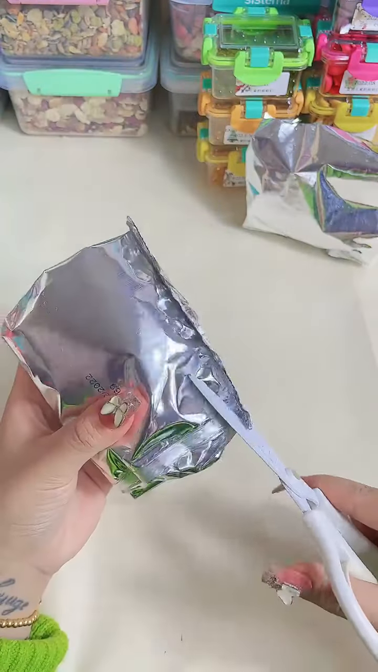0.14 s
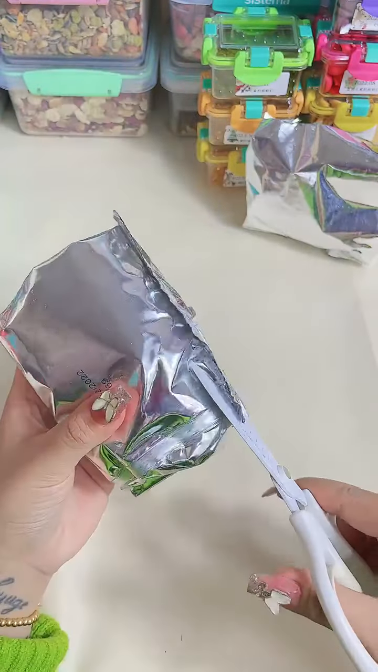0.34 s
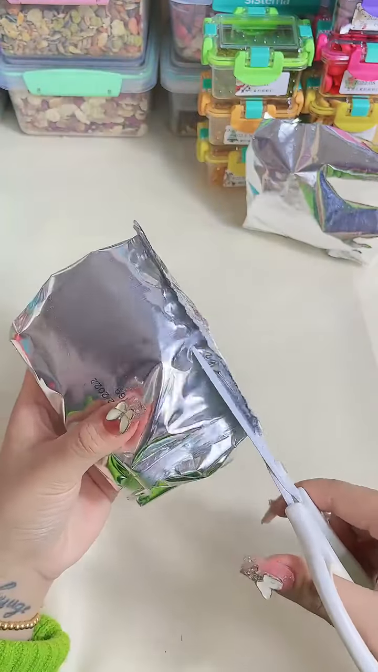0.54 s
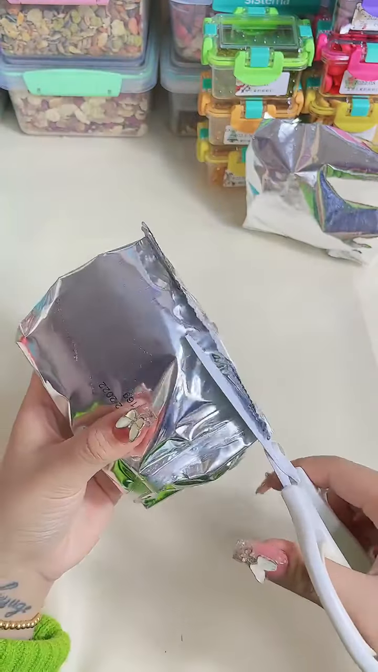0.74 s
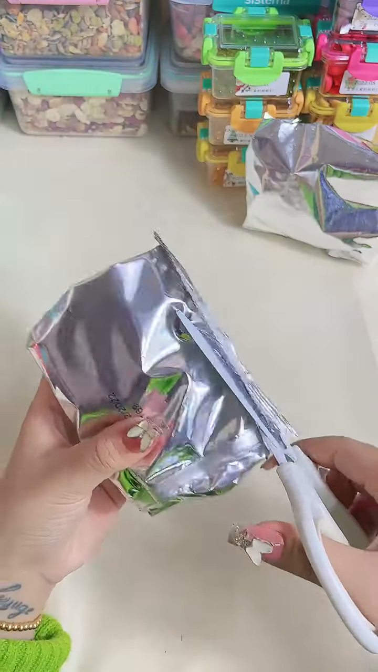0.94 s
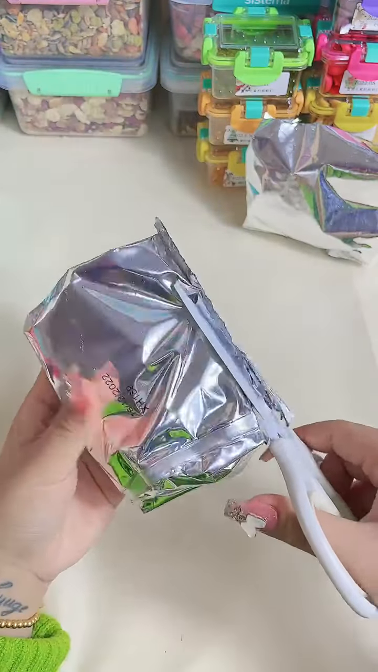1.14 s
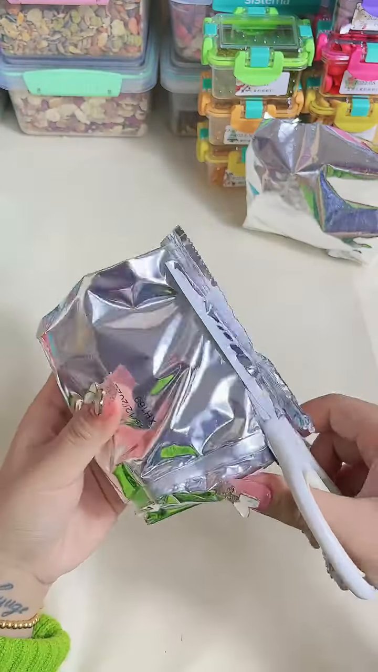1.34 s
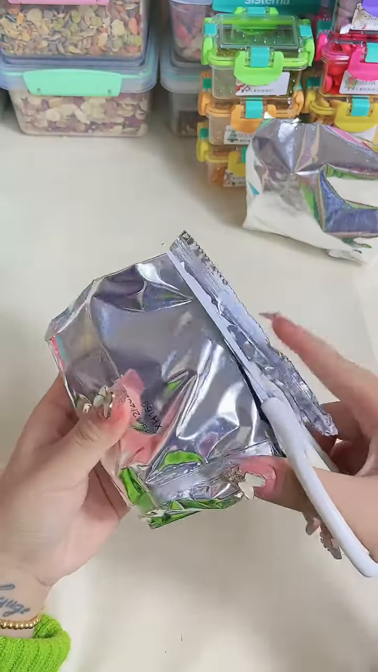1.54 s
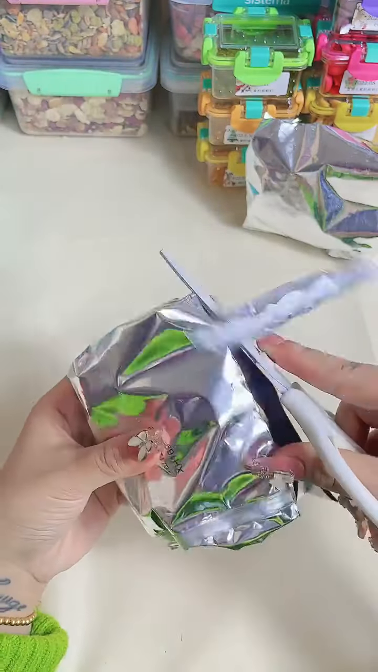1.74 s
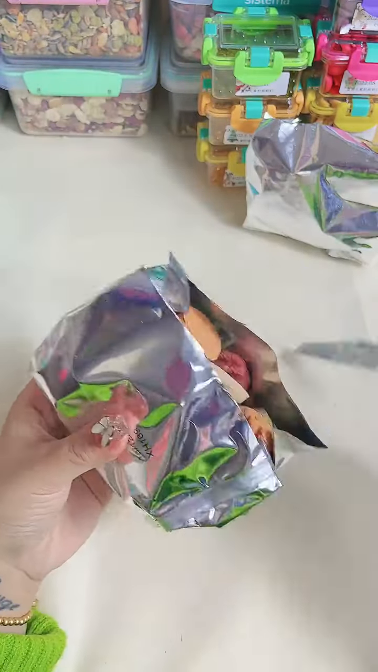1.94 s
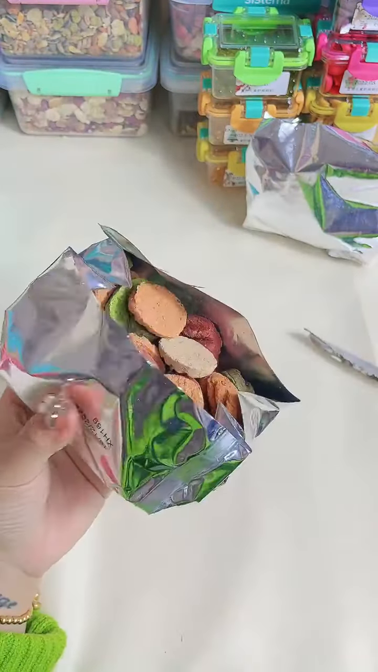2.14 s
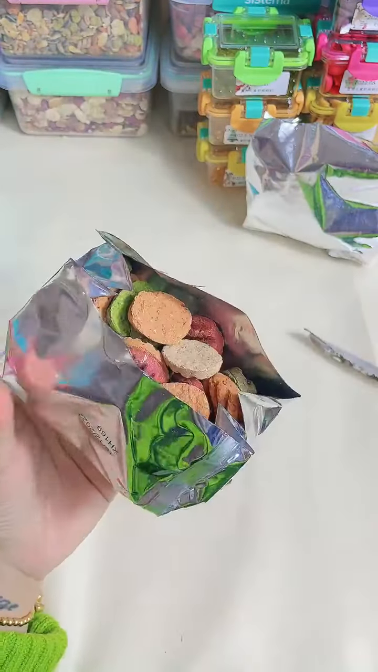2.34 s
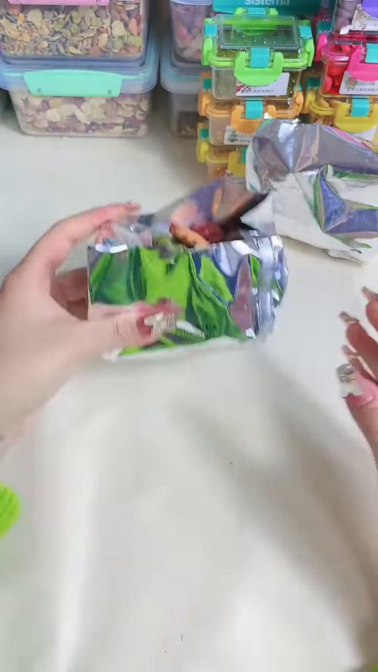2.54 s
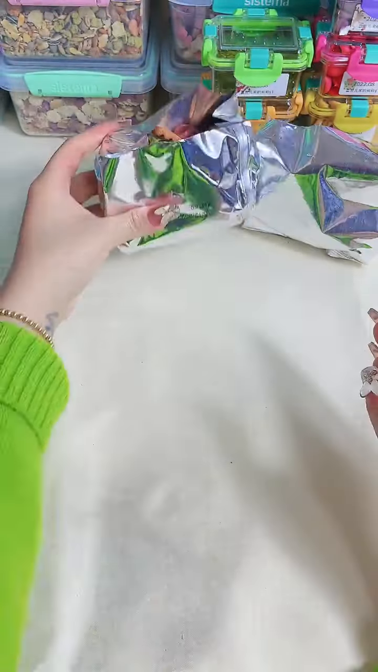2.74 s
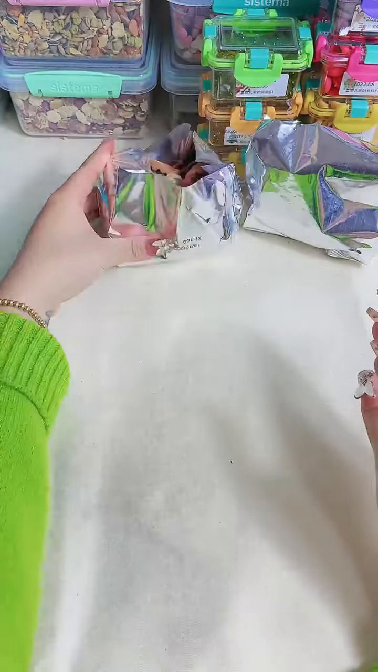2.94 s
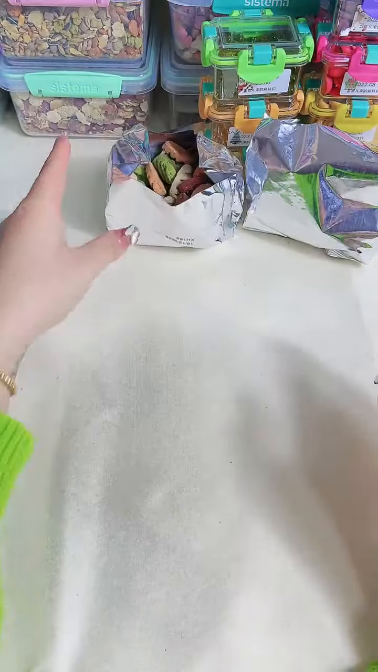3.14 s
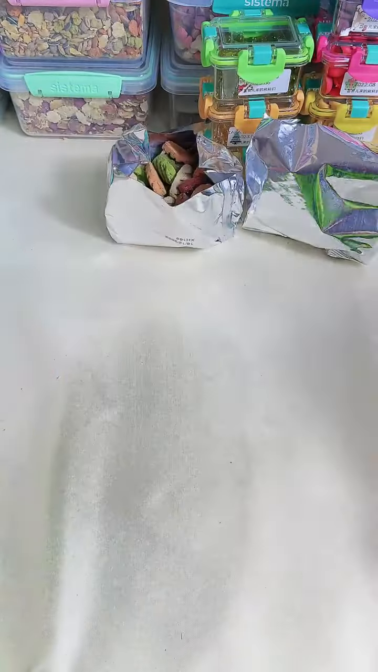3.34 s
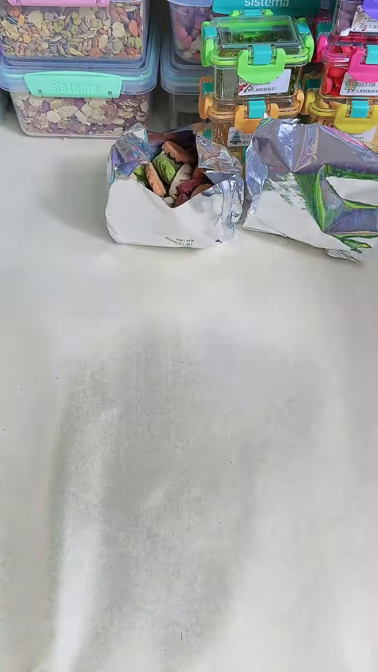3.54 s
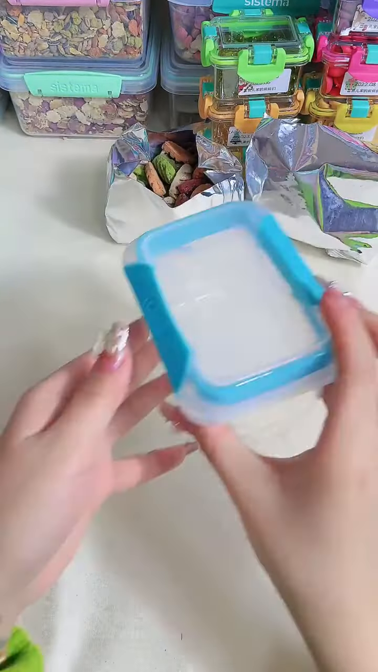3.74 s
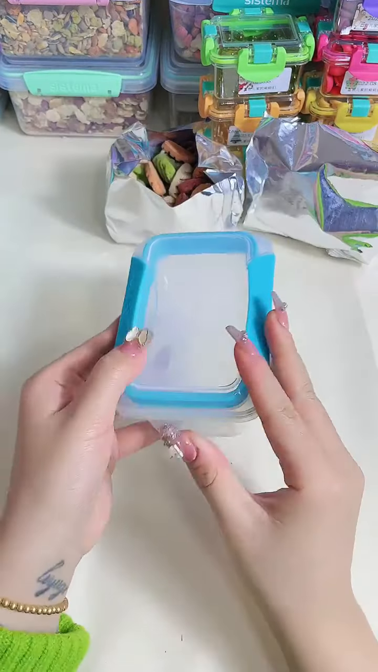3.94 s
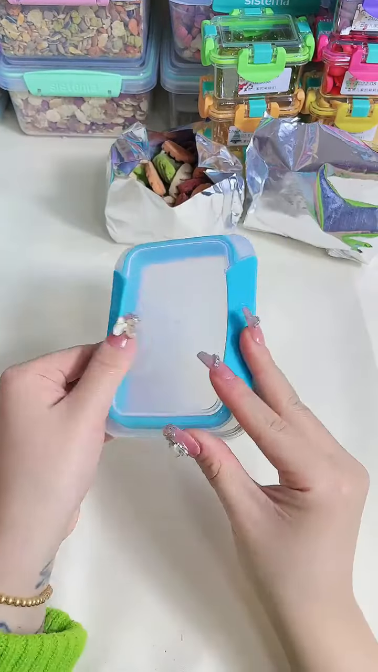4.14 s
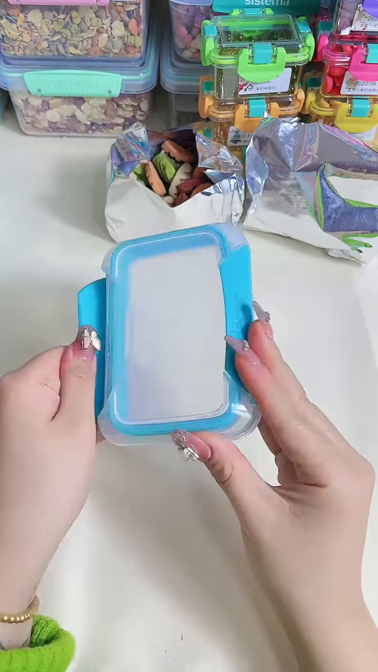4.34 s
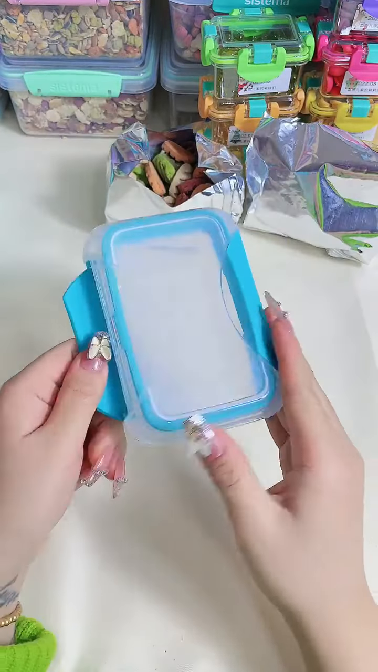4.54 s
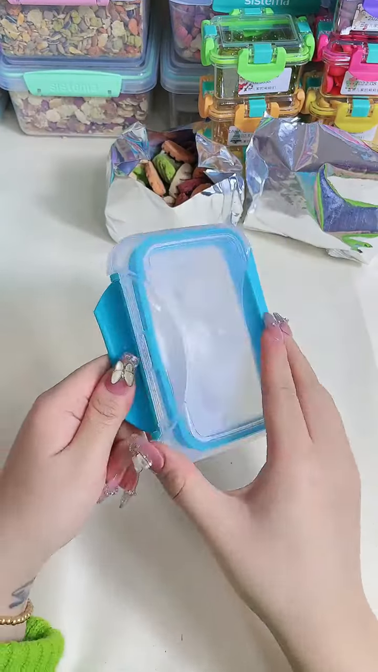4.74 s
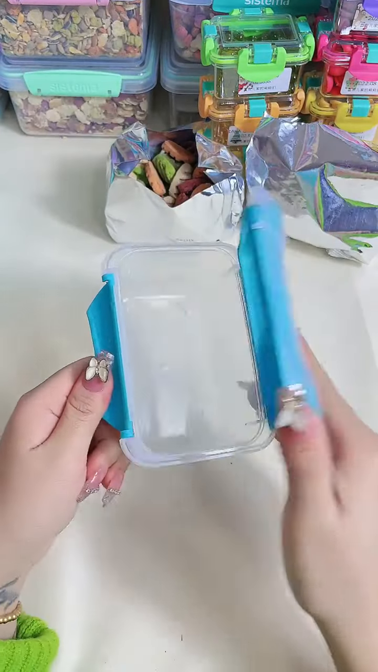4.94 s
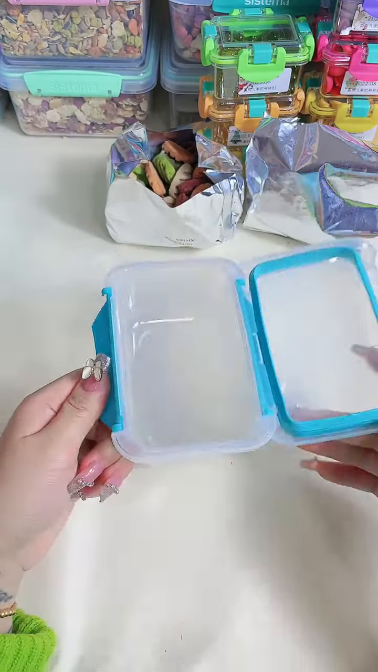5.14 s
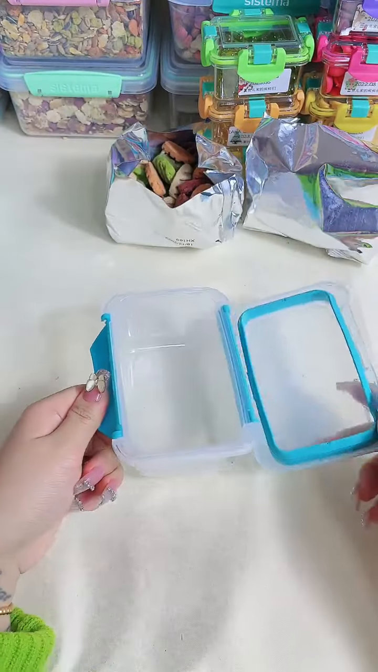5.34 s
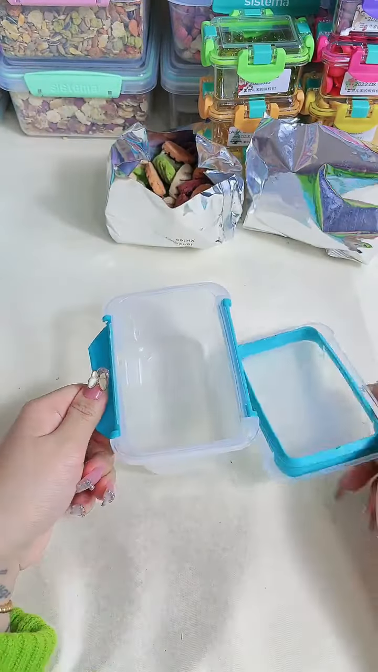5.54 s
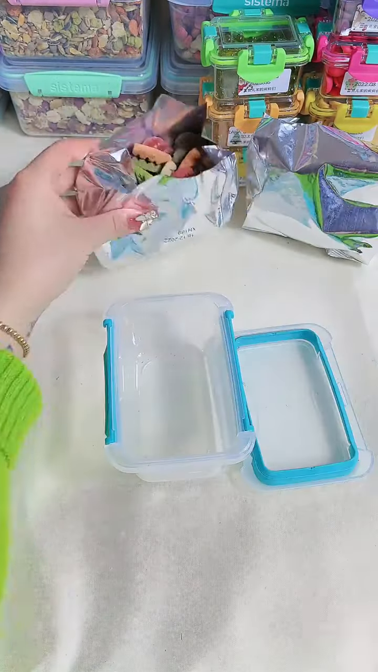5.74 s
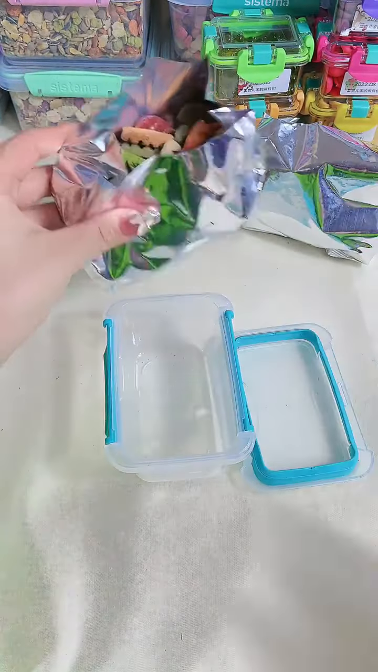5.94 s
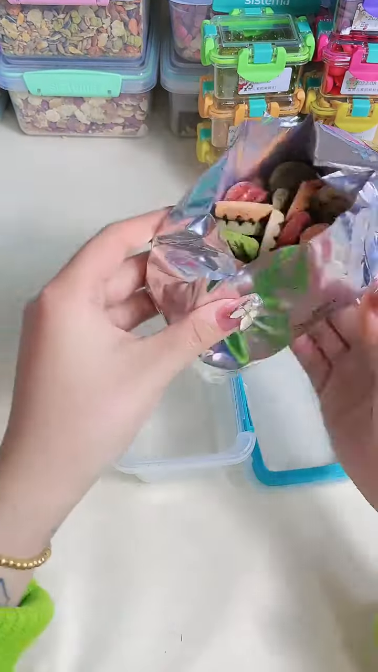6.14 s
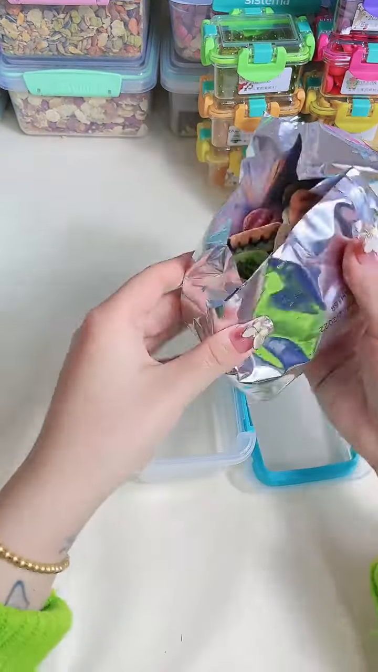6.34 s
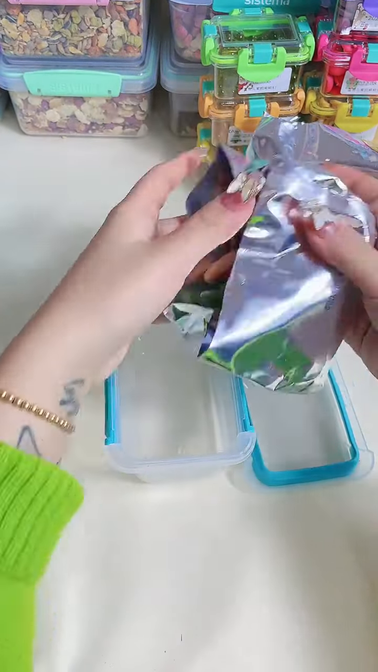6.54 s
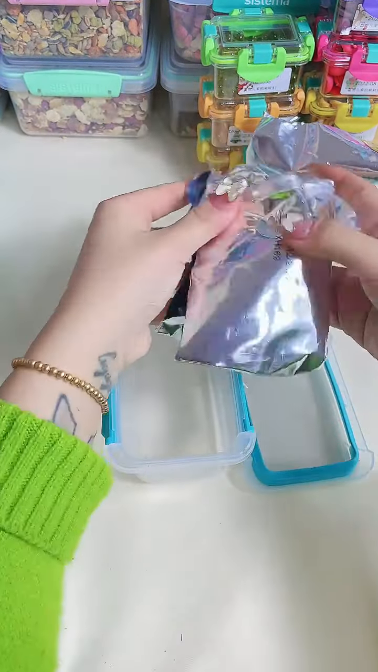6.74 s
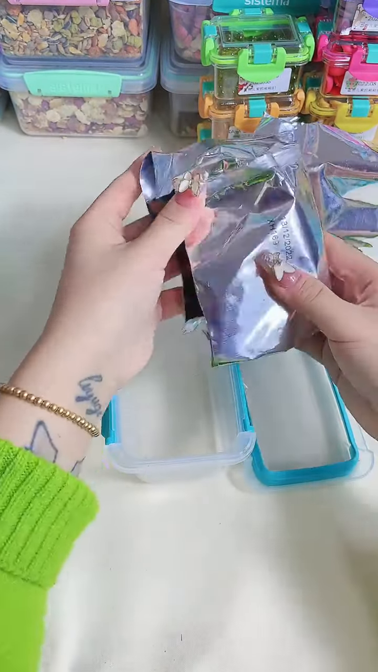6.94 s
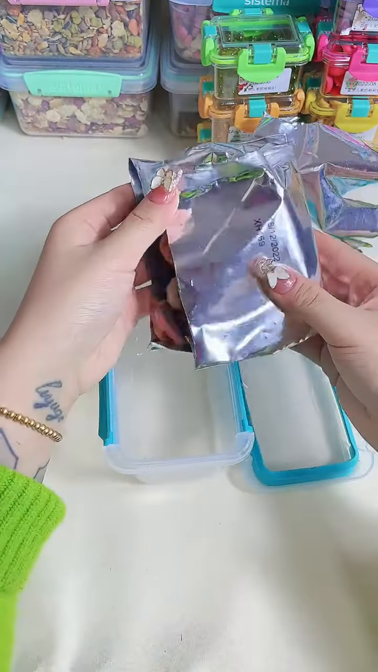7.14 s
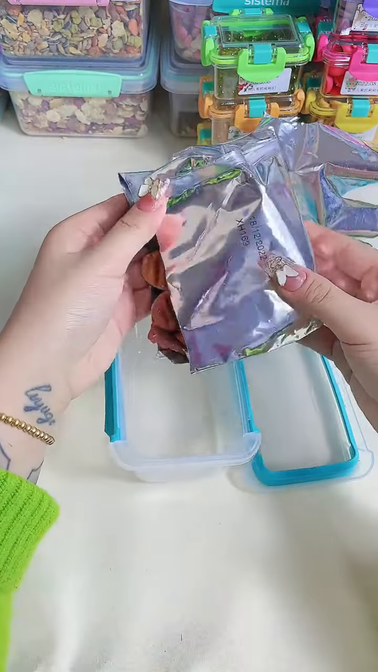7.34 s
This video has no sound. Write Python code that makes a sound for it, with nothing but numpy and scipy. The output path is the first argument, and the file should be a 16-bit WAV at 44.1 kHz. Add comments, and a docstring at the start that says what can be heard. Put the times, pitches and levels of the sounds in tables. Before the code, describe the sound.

Bright foil crackle and uneven scissor cuts come first, close to the microphone, followed by a double clatter of scissors on a padded table top. A few crisp foil bursts end in a sharp crack as the pouch is put down. After a quiet pause, light hollow plastic clicks, rubs and knocks tell of a box being unlatched and opened. Then foil crumples continuously, with little room sound.

```python
"""Scissors cut open a foil snack pouch close by, then are dropped on a covered table; the pouch is set down.
A plastic box is unlatched and its lid laid aside; then the pouch is picked up and squeezed.
Foil is swarms of tiny buckles plus single snaps that drum its panels; sliding plastic is a swarm of slips.
Knocks ring modes of scissors, full pouch and box, blows boom in the table top; the room is small and dry."""
import sys
import numpy as np
from scipy import signal
from scipy.fft import rfft, irfft
from scipy.io import wavfile
from scipy.ndimage import uniform_filter1d

SR = 44100
rng = np.random.default_rng(int(sys.argv[2]) if len(sys.argv) > 2 else 0)


def int16_out(signal):
    """Quantize to a 16-bit WAV file."""
    q = np.round(np.clip(np.atleast_2d(signal).T, -1, 1) * 32767)
    wavfile.write(sys.argv[1], SR, q.astype(np.int16))


N = 325458

CRACK_LEAD_S = 0.003  # swell ahead of the peak
FOIL_RELAX_S, FOIL_PATCHY_DB = 0.013, 4.0
FOIL_LOW_HZ, FOIL_HIGH_HZ = 1170, 5000  # edges of the weight and brightness shelves


def gain_of(db):
    """Decibels to amplitude."""
    return 10 ** (np.asarray(db) / 20)


def evened(x):
    """Scales to rms 1."""
    return x / np.sqrt(np.mean(x ** 2) + 1e-20)


def as_blow(x):
    """Scales a short sound to the energy of 50 ms at rms 1."""
    return evened(x) * np.sqrt(SR / 20 / x.shape[-1])


def read(points, hz):
    """Reads a table on a log-frequency axis."""
    f, value = np.transpose(points)
    return np.interp(np.log(hz + 1), np.log(f + 1), value)


def add(mix, s, sound):
    """Mixes a sound into both channels at time s."""
    start = max(round(s * SR), 0)
    part = mix[:, start:][:, :sound.shape[-1]]
    part += sound[..., :part.shape[1]]


def shelf(hz, edge_hz, order=4):
    """Rises smoothly from 0 to 1 around the edge."""
    return hz ** order / (hz ** order + edge_hz ** order)


def stereo_pair(z, hz):
    """Turns two unrelated spectra into partly alike left and right channels."""
    # Each row: frequency in Hz, phase by which left leads right in radians
    left_lead = [(50, 0), (2000, 0), (5300, 0), (6600, 3), (8800, 3.3), (9700, 6.3), (11900, 6.3),
                 (12900, 9.4)]
    # Each row: frequency in Hz, left-right likeness from 0 to 1
    likeness = [(60, 0.85), (250, 0.82), (640, 0.31), (1400, 0.67), (3100, 0.44), (5000, 0.018),
                (7500, 0.71), (14000, 0.026)]
    same = np.clip(read(likeness, hz), 0, 1)
    mixed = same * z[0] + np.sqrt(1 - same ** 2) * z[1]
    return np.array([z[0], mixed * np.exp(-1j * read(left_lead, hz))])


def hush():
    """The faint air of the room: shaped noise whose level wavers a little, below about 8 Hz."""
    # Spectrum of the air. Each row: frequency in Hz, relative density in dB per Hz
    air_spectrum = [(30, 5), (70, 2.5), (140, 3.5), (300, -6.5), (600, -7), (1200, -10.5), (3000, -10),
                    (6000, -10.5), (8000, -10.5), (11000, -12.5), (13000, -23), (15000, -48)]
    level_db, waver_db = -74.5, 0.3
    hz = np.fft.rfftfreq(N, 1 / SR)
    waver = evened(irfft(rfft(rng.standard_normal(N)) * (1 - shelf(hz, 8)), N))
    z = stereo_pair(rfft(rng.standard_normal((2, N))), hz)
    air = evened(irfft(z * gain_of(read(air_spectrum, hz)), N))
    return gain_of(level_db + waver_db * waver) * air


def buckles(per_s, spread_db, grain_s, hiss, count=32):
    """A swarm of tiny clicks of uneven size, each on one of many facets with its own band, over a fine hiss."""
    happens = rng.random(N) < per_s / SR
    size = gain_of(spread_db * np.minimum(rng.exponential(1, N), 4)) * happens
    facet = rng.integers(0, count, N)
    t, hz = np.arange(256) / SR, np.fft.rfftfreq(256, 1 / SR)
    centre_hz = np.linspace(-2000, 16000, count)[:, None, None]
    band = 1 / (1 + ((hz - centre_hz) / 3500) ** 2)
    grains = rng.standard_normal((count, 2, len(t))) * np.exp(-t / grain_s)
    rings = irfft(rfft(np.roll(grains, 16, axis=2)) * band)  # 16 samples spare for pre-ringing
    swarm = np.zeros((2, N))
    for k in range(count):
        clicks = (size * (facet == k))[None]
        swarm += signal.oaconvolve(clicks, rings[k], axes=1)[:, :N]
    swarm = evened(swarm) + hiss * rng.standard_normal((2, N))
    power = uniform_filter1d((swarm ** 2).mean(0), size=500)
    return swarm / np.sqrt(power + 1e-9)


def pressure(t, strokes, relax_s):
    """Strength of each stroke, one row each: swells as a power of time, holds, relaxes exponentially."""
    swell_power = 1.44
    start, rise_s, hold_s, level_db = np.transpose(strokes)[:4, :, None]
    swell = np.clip((t - start) / np.maximum(rise_s, .002), 0, 1) ** swell_power
    since_hold_s = np.maximum(t - start - rise_s - hold_s, 0)
    return gain_of(level_db) * swell * np.exp(-since_hold_s / relax_s)


def handled(grains, strokes, relax_s, spectrum, low_hz, high_hz, patchy_db):
    """Grains coloured by a spectrum with slowly drifting random patches; strokes tilt it by power share."""
    hz, t, z = signal.stft(grains, SR, nperseg=512, noverlap=384)
    share = pressure(t, strokes, relax_s) ** 2 + 1e-16
    power = share.sum(0)
    weight_db, bright_db = np.transpose(strokes)[4:] @ (share / power)
    hz = hz[:, None]
    colour_db = read(spectrum, hz)
    colour_db = colour_db + weight_db * (1 - shelf(hz, low_hz)) + bright_db * shelf(hz, high_hz)
    patches = uniform_filter1d(rng.standard_normal(z.shape[1:]), size=3, axis=0)  # across bins
    patches = evened(uniform_filter1d(patches, size=18, axis=1))  # across frames
    colour = gain_of(colour_db + patchy_db * patches)
    colour /= np.sqrt(np.mean(colour ** 2, axis=0))
    sound = signal.istft(stereo_pair(z, hz) * colour, SR, nperseg=512, noverlap=384)[1][:, :N]
    return sound * np.interp(np.arange(N) / SR, t, np.sqrt(power))


def crinkling():
    """Fine buckles: faint rustle while a hand holds the pouch, louder at each crumpling push of the fingers."""
    # Holds of the pouch. Each row: start in seconds, length in seconds, relative level in dB
    grips = [(0.0, 1.582, -50.5), (1.645, 1.373, -53.5), (5.65, 0.22, -60), (6.117, 1.28, -46)]
    # Pushes of the fingers. Each row: start, rise and hold in seconds, relative level in dB,
    # weight of the lows in dB, brightness of the highs in dB
    crinkles = [(1.97, 0.03, 0.024, -45.5, -4.5, -9), (2.08, 0.0072, 0.027, -50, -11, -18),
                (2.25, 0.013, 0.06, -50.5, -8, 0.5), (2.426, 0.073, 0.025, -32, 1, -2.5),
                (2.53, 0.019, 0.0067, -30.5, -15.5, -1.5), (2.6, 0.02, 0.073, -51, 0, -6),
                (2.875, 0.0037, 0.031, -23.5, -4, -8), (2.93, 0.023, 0.058, -47, 4, -4),
                (5.65, 0.016, 0.044, -40.5, -1.5, -1), (5.71, 0.0076, 0.064, -45.5, -6, -15),
                (5.78, 0.011, 0.023, -51.5, 1, 0.5), (6.115, 0.028, 0.022, -35.5, 3.5, 6.5),
                (6.18, 0.017, 0.019, -39, -3, -3), (6.226, 0.032, 0.0089, -28, 2.5, 0.5),
                (6.305, 0.041, 0.021, -33, 3.5, -1.5), (6.387, 0.015, 0.035, -31, 0.5, -5),
                (6.497, 0.029, 0.019, -35, 1, -6), (6.558, 0.071, 0.039, -34, 0, -1.5),
                (6.685, 0.03, 0.019, -25.5, -1, -3), (6.775, 0.044, 0.097, -36.5, 1, 1),
                (6.96, 0.011, 0.07, -40, -3, -6.5), (7.04, 0.017, 0.04, -38, 4, 4),
                (7.108, 0.0071, 0.027, -31.5, -2, -10.5), (7.16, 0.012, 0.064, -31.5, 1, -5.5),
                (7.312, 0.027, 0.0095, -40, -11, -19)]
    # Spectrum of crumpled foil. Each row: frequency in Hz, relative density in dB per Hz
    foil_spectrum = [(40, -35), (125, -8.5), (200, -11), (350, 1), (600, -0.5), (1000, -3.5), (1600, -3.5),
                     (2400, -3.5), (3500, -8.5), (4800, -7.5), (5700, -6), (7700, -7.5), (10000, -14),
                     (12000, -20), (13300, -32.5), (15000, -56.5)]
    rise_s, weight_db, bright_db = 0.0077, 0, -4.5
    fine = buckles(per_s=6500, spread_db=2.8, grain_s=.0004, hiss=.4)
    holding = [(s, rise_s, length_s, db, weight_db, bright_db) for s, length_s, db in grips]
    return gain_of(-0.58) * handled(fine, [*crinkles, *holding], FOIL_RELAX_S, foil_spectrum,
                                    FOIL_LOW_HZ, FOIL_HIGH_HZ, FOIL_PATCHY_DB)


def crack(spectrum, bright_db, length_s, skirt_db, tail_db, tail_s, size=2048):
    """A noise burst swells briefly to one sharp peak 3 ms in, then dies in a short and a long decay."""
    swell_s, peak_s = .0016, .0005
    age, hz = np.arange(size) / SR - CRACK_LEAD_S, np.fft.rfftfreq(size, 1 / SR)
    dying = np.exp(-abs(age) / max(length_s, 1e-4)) + gain_of(tail_db) * np.exp(-abs(age) / tail_s)
    skirt = np.where(age < 0, np.exp(-abs(age) / swell_s), dying)
    shape = np.exp(-abs(age) / peak_s) + gain_of(skirt_db) * skirt
    z = stereo_pair(rfft(rng.standard_normal((2, size)) * shape), hz)
    burst = irfft(z * gain_of(read(spectrum, hz) + bright_db * shelf(hz, 3800)))
    return as_blow(burst * np.hanning(2 * size)[size:])


def snaps():
    """Creases snap through: each cracks and drums the slack panel beside it, which rings a few cycles."""
    # Each row: time in seconds, crack level in dB, brightness in dB, crack length in seconds,
    # panel pitch in Hz, panel level in dB
    creases = [(0.041, -40, -7, 0.00087, 1290, -66), (0.0444, -35.5, -11.5, 0.013, 1400, -44.5),
               (0.075, -47.5, -25, .001, 1200, -51.5), (.132, -47, -3, .0021, 1000, -29.5),
               (0.14, -31.5, 5, 0.01, 930, -40), (0.1991, -27, -5.5, 0.0028, 400, -39),
               (0.251, -35.5, -10.5, 0.002, 410, -54), (0.403, -44, -19, .0012, 1100, -54),
               (0.438, -42.5, -19, 0.0022, 970, -46), (0.5514, -31.5, -16, 0.0021, 370, -36),
               (0.599, -29.5, 22, 0.00058, 1210, -60), (0.711, -41, -27, 0.0019, 850, -40.5),
               (0.8214, -40, 7, 0.00087, 913, -55), (0.844, -26.5, -5.5, 0.0036, 870, -35),
               (.861, -34.5, -14, 0.0052, 930, -33.5), (0.891, -46, 9, .0015, 895, -54),
               (0.938, -55, 8, .0008, 900, -66), (0.982, -56, -2.5, .0005, 900, -60),
               (1.067, -35.5, -1, .0009, 840, -53), (1.0746, -31, -6, 0.00045, 1124, -54),
               (1.109, -30.5, 0, 0.0062, 980, -43), (1.135, -60, -5, .001, 900, -51),
               (1.176, -55, -14, .0015, 403, -59), (1.2672, -27.5, -7, 0.00097, 363, -48.5),
               (1.3112, -42, -7, 0.0044, 356, -50), (1.362, -32.5, 1.5, 0.0062, 910, -41.5),
               (1.386, -38, 2, 0.014, 940, -41), (1.4524, -50.5, 1, 0.0016, 590, -63),
               (1.5051, -36, -17, 0.0054, 980, -39.5), (1.6567, -41.5, 24, 0.0005, 970, -66),
               (1.669, -48, 15, 0.0023, 900, -67), (1.8288, -33.5, 14.5, 0.0055, 307, -54),
               (1.925, -64, -17, .001, 810, -68), (1.935, -52.5, -6, 0.0043, 810, -69),
               (1.9805, -49, 10, 0.0053, 980, -60), (2.059, -33, -5.5, 0.0024, 450, -57),
               (2.0713, -45, -13, 0.0045, 610, -59), (2.131, -55.5, 4, 0.0034, 900, -67.5),
               (2.1497, -48.5, -9, 0.0042, 980, -60), (2.198, -54.5, -6, .002, 990, -66),
               (2.307, -53, 6, .002, 900, -65), (2.478, -36, -29, 0.0013, 420, -51),
               (2.5262, -38.5, -17, 0.0032, 1100, -46), (2.566, -45, -17, 0.0033, 1520, -54),
               (2.6045, -39, -8, 0.0036, 614, -51), (2.652, -51.5, 5, 0.0025, 600, -65),
               (2.7082, -41, -25, 0.0032, 724, -46.5), (2.773, -68, -6, .003, 314, -52),
               (2.841, -43, -6.5, 0.0096, 717, -48), (2.8525, -41.5, -9, 0.036, 900, -47),
               (2.876, -31, -27, 0.0057, 590, -34.5), (2.887, -30, -4, 0.0094, 1023, -35.5),
               (2.987, -50.5, -12.5, 0.0046, 1203, -51.5), (5.6602, -49.5, 1, 0.0036, 756, -49),
               (5.695, -44, -14, 0.0046, 1230, -61), (5.7161, -38, 11, 0.0069, 580, -31.5),
               (5.7635, -36, -3, 0.0053, 1030, -44.5), (5.8456, -56, -11, 0.0093, 423, -64.5),
               (6.1964, -44, -5, .003, 614, -50), (6.2494, -42, -33, 0.0017, 930, -44.5),
               (6.27, -44, -12, 0.0022, 824, -52), (6.351, -51, -12, .001, 1300, -56),
               (6.519, -47, 0, .002, 1200, -58), (6.667, -46, -10, 0.0022, 1520, -59),
               (6.846, -57, -14, .001, 1100, -51), (6.87, -48, -18, .002, 910, -49),
               (6.97, -58, -10, .002, 890, -55), (6.403, -37, -3, 0.011, 1260, -40.5),
               (6.4106, -32, 4, 0.013, 1280, -51), (6.5265, -32, -2.5, 0.0069, 1210, -48),
               (6.7257, -32, -15, 0.009, 1240, -53), (6.9106, -39.5, -15, 0.0044, 790, -51),
               (6.9203, -32, 16, 0.0027, 545, -60), (7.061, -46.5, -16, .0087, 407, -44),
               (7.12, -43, -16, .001, 960, -56), (7.129, -40, -16, 0.0034, 1000, -64),
               (7.224, -55, -12, .0015, 700, -52)]
    # Spectrum of a crack. Each row: frequency in Hz, relative density in dB per Hz
    crack_spectrum = [(40, -33.5), (150, -28.5), (500, -12), (1200, -6.5), (2000, 2), (3500, -0.5),
                      (5500, 2.5), (7700, -8), (10000, -5.5), (12000, -8.5), (14500, -38.5), (16500, -43.5)]
    out, t = np.zeros((2, N)), np.arange(2048) / SR
    for s, crack_db, bright_db, length_s, panel_hz, panel_db in creases:
        snap = crack(crack_spectrum, bright_db, length_s, skirt_db=-8, tail_db=-15, tail_s=.0045)
        add(out, s - CRACK_LEAD_S, gain_of(crack_db) * snap)
        cycles = panel_hz * t
        panel = np.sin(2 * np.pi * cycles) * cycles * np.exp(-cycles / 0.87)
        add(out, s, gain_of(panel_db) * as_blow(panel))
    return out


def cutting():
    """Coarse buckles crunch at each push of the blades through the foil."""
    # Pushes of the blades. Each row: start, rise and hold in seconds, relative level in dB,
    # weight of the lows in dB, brightness of the highs in dB
    snips = [(0.067, 0.044, 0.057, -26.5, -1.5, 5.5), (0.202, .012, 0.037, -37.5, -2, -17),
             (0.26, 0.014, 0.008, -34.5, -21.5, -8), (0.35, 0.047, 0.029, -31.5, -2, -1.5),
             (0.501, 0.014, .08, -46.5, 2, 1), (0.583, 0.01, 0.021, -22, -2, 4),
             (0.697, 0.013, 0.054, -43.5, 5, 7), (0.78, 0.02, 0.016, -37, -1.5, 5),
             (0.828, 0.025, 0.025, -25, 0.5, 1), (.925, 0.055, 0.044, -30.5, -1, -0.5),
             (1.048, 0.013, 0.074, -30.5, 0.5, 0), (1.166, 0.026, 0.091, -39.5, 0.5, 5.5),
             (1.346, 0.017, 0.013, -29.5, 2.5, 8), (1.453, 0.025, 0.073, -46.5, 1, 1),
             (1.634, 0.019, 0.027, -45, -15, 30), (1.72, 0.022, 0.019, -31.5, 2, 2.5),
             (1.774, 0.012, 0.049, -43.5, 4, -6)]
    # Spectrum of cut foil. Each row: frequency in Hz, relative density in dB per Hz
    cut_spectrum = [(40, -30.5), (125, -13), (200, -14), (350, -0.5), (600, -1.5), (1000, -1.5), (1800, -3),
                    (2700, -6), (3800, -7), (5500, -6), (7700, -7.5), (10000, -14.5), (12400, -22),
                    (13600, -41.5), (15000, -58)]
    coarse = buckles(per_s=4200, spread_db=3.3, grain_s=.0005, hiss=.45)
    return gain_of(0.5) * handled(coarse, snips, FOIL_RELAX_S, cut_spectrum,
                                  FOIL_LOW_HZ, FOIL_HIGH_HZ, FOIL_PATCHY_DB)


def chafes(slips):
    """Short rough moans: the grit of sticking and slipping drives one broad resonance while a contact slides."""
    # Blades, foil or plastic on each other, skin or cloth. Each row: start in seconds, length in seconds,
    # pitch in Hz, half width at half amplitude in Hz, level in dB
    moans = [(0.082, 0.054, 1750, 300, -33.5), (0.377, 0.053, 2750, 400, -37.5),
             (0.996, 0.058, 2900, 500, -36), (1.721, 0.064, 1700, 350, -41),
             (2.252, 0.12, 150, 60.4, -45.5), (2.26, .075, 730, 91, -47), (2.261, 0.052, 1420, 80, -47),
             (2.229, 0.024, 1514, 705, -39), (2.736, 0.057, 647, 150, -50.5),
             (3.813, 0.036, 2190, 498, -38.5), (4.322, 0.045, 410, 29.5, -40),
             (4.318, 0.032, 750, 199, -48.5), (4.824, 0.043, 480, 120, -46.5),
             (4.927, 0.073, 814, 130, -44.5), (5.086, 0.054, 1340, 160, -45), (2.369, 0.026, 710, 500, -38),
             (5.268, 0.055, 500, 220, -38), (5.303, 0.064, 1150, 260, -45), (5.309, 0.14, 1950, 259, -48),
             (5.522, 0.049, 1570, 595, -45.5), (5.53, 0.055, 320, 149, -48),
             (2.926, 0.097, 800, 251, -51.5), (5.264, 0.067, 1150, 450, -49),
             (5.302, 0.061, 400, 220, -45.5), (5.277, 0.13, 104, 40, -50), (5.49, 0.02, 1560, 300, -41),
             (5.654, 0.15, 532, 89.5, -42.5), (5.898, 0.047, 1310, 220, -58.5),
             (5.9, 0.05, 520, 59.7, -62.5), (6.328, 0.047, 1200, 400, -46), (6.71, 0.053, 2700, 500, -38.5),
             (6.773, .1, 10000, 900, -57)]
    out = np.zeros((2, N))
    for s, length_s, pitch_hz, width_hz, db in moans:
        swell = np.hanning(max(round(length_s * SR), 64))
        hz = np.fft.rfftfreq(len(swell), 1 / SR)
        z = stereo_pair(rfft(slips[:, max(round(s * SR), 0):], len(swell)), hz)
        z = z / (1 + ((hz - pitch_hz) / width_hz) ** 2)
        add(out, s, gain_of(db) * evened(irfft(z, len(swell)) * swell))
    return out


def table():
    """The table top booms softly through its cloth; each blow meets the modes differently."""
    # Blows. Each row: time in seconds, level in dB, t60 in seconds, most excited pitch in Hz
    thumps = [(.254, -52.5, 0.077, 150), (1.752, -49, 0.081, 141), (2.249, -31, 0.043, 120),
              (2.262, -42, .09, 240), (2.285, -46.5, 0.094, 105), (2.298, -35, 0.11, 122),
              (2.388, -36.5, 0.025, 62.4), (3.255, -68, 0.12, 129.7), (4.586, -41, 0.047, 192),
              (4.715, -49.5, 0.16, 203), (5.289, -40.5, 0.31, 121), (5.344, -48, .08, 159.4),
              (5.507, -46, 0.014, 130), (5.554, -62, 0.099, 110)]
    # Table top modes. Each row: mean frequency in Hz, mean relative level in dB
    top_modes = [(45, -9.5), (68, -5), (92, -12.5), (113, -5.5), (131, 9), (165, 1), (212, 2), (255, 0.5)]
    out, t = np.zeros((2, N)), np.arange(SR // 4) / SR
    hz, mode_db = np.transpose(top_modes)[:, :, None]
    for s, db, t60_s, focus_hz in thumps:
        share = gain_of(mode_db + rng.normal(0, 1.2, hz.shape))
        share = share / (1 + (np.log2(hz / focus_hz) / 0.66) ** 2)
        varied_hz = hz * rng.uniform(.975, 1.025, hz.shape)  # each mode's pitch varies by up to 2.5 percent
        phase = rng.normal(0, 0.23, (2, len(top_modes), 1))
        boom = (share * np.sin(2 * np.pi * varied_hz * t + phase)).sum(1)
        boom = boom * gain_of(-60 * t / t60_s) * (1 - np.exp(-t / 0.0079))
        add(out, s, gain_of(db) * as_blow(boom))
    return out


def rubbing(slips):
    """Plastic slides on cloth, fingers or plastic: strokes shape and colour a swarm of slips."""
    # Each row: start, rise and hold in seconds, relative level in dB, weight of the lows in dB,
    # brightness of the highs in dB
    rubs = [(2.232, 0.0084, 0.064, -40.5, -18, -18), (2.366, 0.025, 0.0031, -40, 5, -17),
            (3.055, 0.012, 0.022, -67.5, -3.5, -12), (3.237, 0.019, 0.031, -59.5, -3.5, -2),
            (3.37, .04, 0.11, -73.5, -8, 10.5), (3.542, 0.018, 0.0086, -52, 1, 0.5),
            (3.6, .01, 0.015, -65.5, 7.5, -16), (3.62, 0.016, 0.045, -72, -1, 13),
            (3.75, 0.023, .01, -72, -6, 6), (3.8, 0.024, 0.0035, -27, -12.5, -5.5),
            (3.865, 0.021, 0.012, -46, -7, -11), (3.93, 0.0085, 0.062, -49, 6, -13),
            (4.03, .01, .04, -71.5, 10.5, -6), (4.1, 0.014, 0.067, -59.5, -12.5, -1),
            (4.19, 0.014, 0.076, -55, 1.5, 0), (4.315, 0.017, 0.021, -29.5, 4, 0),
            (4.41, 0.017, 0.06, -48.5, -10, 7), (4.48, 0.016, 0.069, -48, -1, -13),
            (4.57, 0.011, 0.027, -40, 1, -14), (4.708, 0.014, 0.0076, -36.5, -8, -3),
            (4.818, 0.0082, 0.008, -40, 5, 9), (4.885, 0.037, 0.0049, -39.5, 15, 4),
            (4.975, 0.029, 0.063, -50, 14, 2), (5.05, 0.013, 0.0035, -40.5, -13, 0),
            (5.08, 0.0089, 0.021, -38, 19, 7), (5.135, 0.017, 0.0028, -42.5, 4, -3.5),
            (5.271, 0.016, 0.12, -41, 0.5, 0.5), (5.58, 0.0085, 0.022, -55, 8, 14.5),
            (5.436, 0.0083, 0.013, -33.5, -5, -18), (5.48, 0.026, 0.07, -44, 12, -7.5),
            (5.87, 0.03, 0.084, -67, -1, -13), (6.005, 0.014, 0.047, -61, -2, -29),
            (6.07, 0.047, 0.0092, -60.5, 7, -2.5)]
    # Fingers resting on the box: one row of the same columns; with the rise below zero it swells in 2 ms
    # and relaxes after rise plus hold
    box_grip = (4.5, -1.23, 1.46, -55.5, 11.5, 1)
    # Spectrum of rubbing. Each row: frequency in Hz, relative density in dB per Hz
    rub_spectrum = [(40, -18.5), (100, -17.5), (200, -23), (350, -11), (600, 3), (1000, -2.5), (2000, -5),
                    (3500, -6.5), (5500, -10), (7700, -11.5), (10000, -19.5), (12000, -28), (14500, -50.5)]
    return gain_of(-3.5) * handled(slips, [*rubs, box_grip], relax_s=0.017, spectrum=rub_spectrum,
                                   low_hz=1210, high_hz=4820, patchy_db=3.8)


def knocks(rows, modes, focus_octaves, tick_tail_db):
    """Each contact ticks and rings the object; where it lands decides which modes speak most, the grip how long."""
    # Spectrum of a tick. Each row: frequency in Hz, relative density in dB per Hz
    tick_spectrum = [(40, -38), (150, -24.5), (600, 2), (1300, 2.5), (2200, -1), (3600, -9), (5300, -10),
                     (7700, -24), (10000, -24.5), (12000, -27.5), (14500, -57.5)]
    out, t = np.zeros((2, N)), np.arange(SR // 8) / SR
    hz, mode_db = np.transpose(modes)[:, :, None]
    swell = 1 - np.exp(-hz * t / 0.21)  # low modes take longer to get going
    for s, tick_db, bright_db, length_s, focus_hz, ring_db, t60_at_800_hz_s, left_db in rows:
        t60_s = t60_at_800_hz_s * (800 / hz) ** 0.15  # high modes die sooner
        share = gain_of(mode_db) / (1 + (np.log2(hz / focus_hz) / focus_octaves) ** 2)
        phase = rng.uniform(0, 2 * np.pi, hz.shape)
        phase = phase + rng.normal(0, 0.51, (2, len(modes), 1))  # each mode radiates its own way
        tones = np.sin(2 * np.pi * hz * t + phase)
        ring = (share * swell * gain_of(-60 * t / t60_s) * tones).sum(1)
        add(out, s, gain_of(ring_db) * as_blow(ring * gain_of([[left_db], [0]])))
        tick = crack(tick_spectrum, bright_db, length_s, skirt_db=-7, tail_db=tick_tail_db, tail_s=.006)
        add(out, s - CRACK_LEAD_S, gain_of(tick_db) * tick)
    return out


def scissors():
    """The dropped scissors land and settle, ringing their modes."""
    # Each row: time in seconds, tick level in dB, brightness in dB, tick length in seconds,
    # most excited pitch in Hz, ring level in dB, ring t60 at 800 Hz in seconds, ring left minus right in dB
    landings = [(2.2455, -39.5, 4, 0.0015, 717, -27.5, 0.044, 0.5),
                (2.2479, -31.5, -2, 0.0038, 1450, -27.5, 0.04, -5),
                (2.2535, -45, -11.5, .002, 250, -44, 0.023, -1.5),
                (2.266, -44.5, -19, .003, 1380, -44.5, 0.029, 4),
                (2.276, -43, -8, .0033, 723, -50, 0.034, 0),
                (2.285, -46.5, -11.5, .003, 700, -54, 0.029, 2.5),
                (2.3887, -40, 10.5, .0025, 880, -31.5, 0.0165, 3.5),
                (2.3915, -38, -11.5, .001, 780, -34.5, 0.018, 0),
                (2.3946, -41, -37, .001, 690, -43, 0.0066, 2)]
    # Each row: mode frequency in Hz, relative level in dB
    scissors_modes = [(330, -12.5), (690, 0.5), (780, -0.5), (1340, -2), (1420, 1.5), (2200, 2.5),
                      (2430, 0), (2800, -0.5), (3900, 8), (4200, 5.5)]
    return knocks(landings, scissors_modes, focus_octaves=0.63, tick_tail_db=-15)


def full_pouch():
    """The full pouch clacks as it is set down and as the nails catch it."""
    # Each row: as in scissors()
    clacks = [(2.877, -55.5, -7.5, 0.0019, 2200, -40.5, .025, 0.016),
              (5.7162, -40, -6, 0.0024, 2714, -34, 0.021, 0),
              (5.7645, -48, -10, 0.0018, 2800, -36.5, 0.03, 0)]
    # Each row: mode frequency in Hz, relative level in dB
    pouch_modes = [(517, -8.5), (953, 0), (1570, 0.5), (2062, -6), (2358, 4), (2826, -0.5), (3150, -9),
                   (4000, -3), (4490, -8)]
    return knocks(clacks, pouch_modes, focus_octaves=0.34, tick_tail_db=-13)


def box():
    """Nails, latches and lid knock on the plastic box and ring its modes."""
    # Each row: as in scissors()
    contacts = [(3.252, -75.5, 16.5, .0031, 493, -69, .027, 5),
                (3.5765, -69.5, 0, 0.0025, 617, -55.5, 0.017, 4),
                (3.8279, -39.5, 19.5, .002, 1800, -40, 0.022, -3),
                (3.8362, -45, -4, 0.0014, 500, -59, 0.013, 1),
                (3.8802, -49.5, 6, .002, 766, -57, 0.024, -4), (3.8951, -60, 7, .001, 1300, -75, .02, 0),
                (3.9459, -48, 5, 0.0027, 720, -49, 0.047, 0), (3.9678, -58, -5, .001, 900, -76, 0.015, 2),
                (4.165, -62.5, 15, 0.0031, 1500, -81, 0.019, -2),
                (4.2972, -72, -23, .003, 850, -49.5, 0.075, 3), (4.329, -47, -14, .003, 500, -46, 0.034, 1),
                (4.3404, -54, -6, .003, 605, -44, 0.035, 15),
                (4.5378, -47.5, -1, 0.0039, 3800, -51, 0.035, 2), (4.54, -49, 0, .002, 670, -48, .025, 4),
                (4.5862, -39, 5.5, 0.0042, 454, -30.5, 0.023, 2),
                (4.7146, -59, 13, 0.0014, 735, -48, 0.021, -2),
                (4.729, -56, 8, 0.0016, 1390, -62, 0.018, 4), (4.772, -80, 8, 0.0028, 360, -47, 0.055, 1),
                (4.8239, -47.5, 14.5, 0.003, 520, -42, 0.022, 2),
                (4.9343, -40.5, -19, 0.0086, 810, -27, 0.027, 1),
                (4.9423, -38.5, 8, 0.0038, 806, -30, 0.037, 5), (5.0165, -80, 1, .0019, 840, -52, 0.025, 1),
                (5.0599, -49, -16, .003, 1000, -44, .016, -3),
                (5.0637, -45, -26, 0.0023, 780, -42.5, 0.022, 3),
                (5.0679, -49.5, 19, 0.0016, 553, -37, 0.013, 2),
                (5.1481, -56, -15, 0.0022, 1500, -48.5, 0.029, -4),
                (5.155, -53.5, 9, 0.0075, 920, -40.5, 0.048, 0),
                (5.1751, -71, -2, .0014, 696, -52, 0.012, 4),
                (5.241, -67, -17, 0.0022, 680, -62.5, 0.02, 0),
                (5.3016, -39.5, -23, 0.011, 640, -36, 0.03, 3),
                (5.3535, -49, -3, .003, 1200, -48, 0.024, 0), (5.391, -51, -6, .003, 1900, -49, 0.025, 4),
                (5.451, -33, 3.5, 0.0011, 1860, -37, 0.038, 0), (5.453, -47, -11, .003, 780, -39, .03, 1),
                (5.5096, -32, -42, 0.00045, 1680, -32, 0.044, 0),
                (5.512, -45, -20, 0.0047, 510, -34.5, 0.036, 0),
                (6.029, -62, -31, 0.003, 800, -80, 0.012, 0)]
    # Each row: mode frequency in Hz, relative level in dB
    box_modes = [(235, -8.5), (372, 3.5), (470, -6.5), (598, -0.5), (775, 1), (862, -3), (960, 0),
                 (1190, -6), (1410, -10), (1620, -8.5), (1860, -12), (2100, -6), (2440, -15), (2800, -14),
                 (3610, -12), (4120, -9), (4530, -19), (5500, -13)]
    return knocks(contacts, box_modes, focus_octaves=0.44, tick_tail_db=-16)


def room(x):
    """A short diffuse tail of noise whose bands die at their own rates."""
    # Each row: frequency in Hz, t60 in seconds
    room_t60 = [(150, 0.33), (800, 0.051), (3000, 0.033), (12000, 0.1)]
    hz, t, z = signal.stft(rng.standard_normal((2, SR // 3)), SR, nperseg=256)
    decay = gain_of(-60 * t / read(room_t60, hz)[:, None])
    tail = signal.istft(z * decay * (t > .004), SR, nperseg=256)[1]
    return signal.fftconvolve(x, tail / np.linalg.norm(tail[0]), axes=1)[:, :N]


def scene():
    """Everything on the table, close up, with a trace of the room."""
    slips = buckles(per_s=4500, spread_db=2.7, grain_s=.0004, hiss=0.6)  # shared by chafes and rubbing
    near = crinkling() + snaps() + cutting() + chafes(slips) + table()
    near += rubbing(slips) + scissors() + full_pouch() + box()
    return near + gain_of(-24.5) * room(near) + hush()


def record(dry):
    """The microphone's bass roll-off and the band limit of the recorder."""
    lean = signal.sosfilt(signal.butter(1, 32, "highpass", fs=SR, output="sos"), dry)
    band_limit = signal.firwin(511, 16400, window=("kaiser", 9), fs=SR)
    return signal.oaconvolve(lean, band_limit[None], "same")


dry = scene()
out = record(dry)
int16_out(out)
```